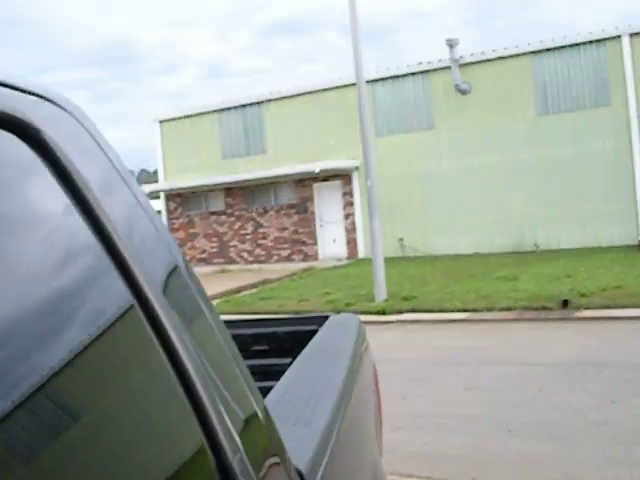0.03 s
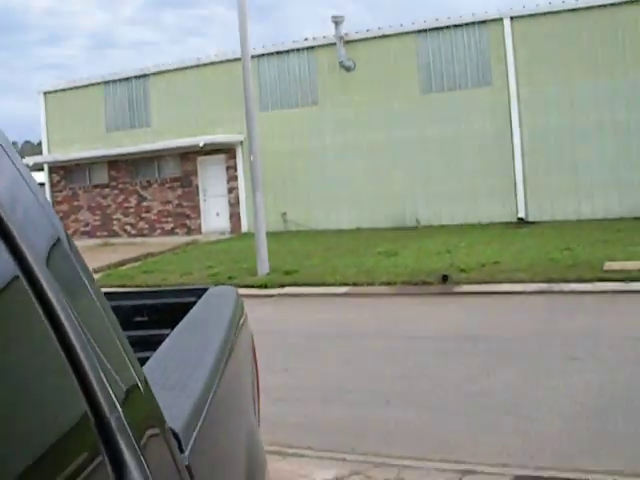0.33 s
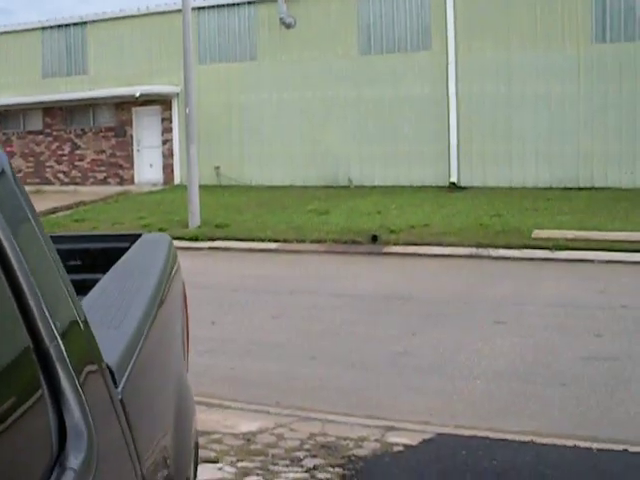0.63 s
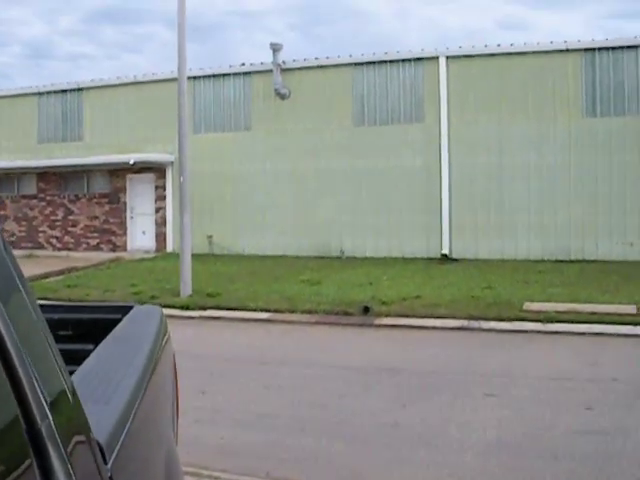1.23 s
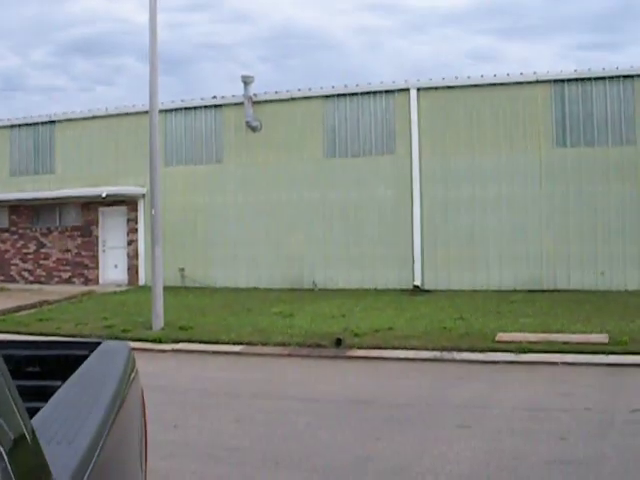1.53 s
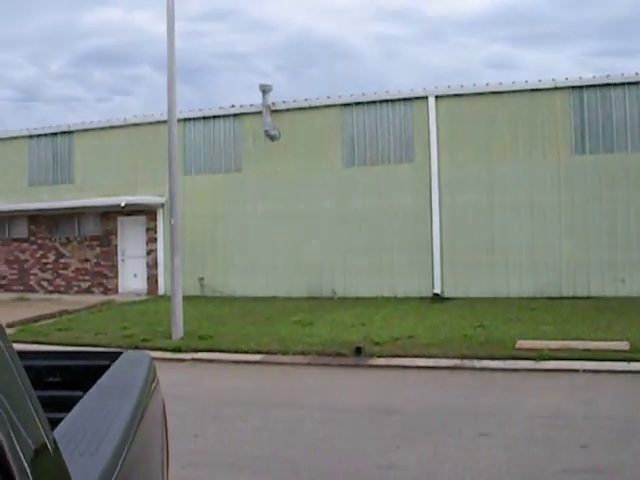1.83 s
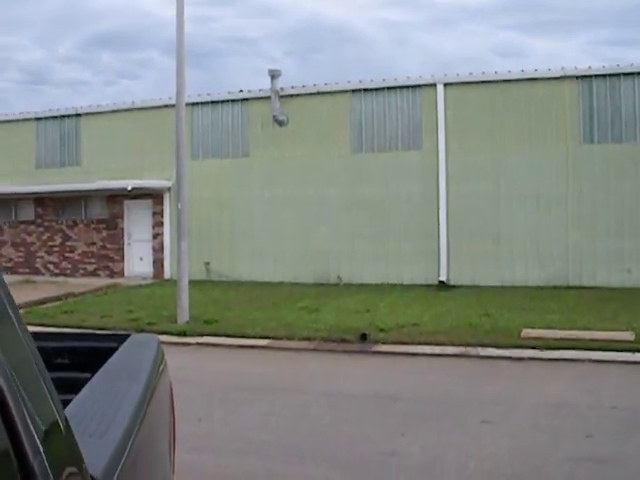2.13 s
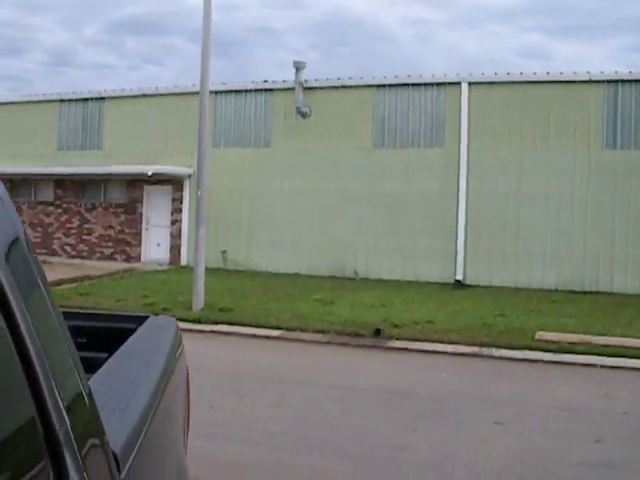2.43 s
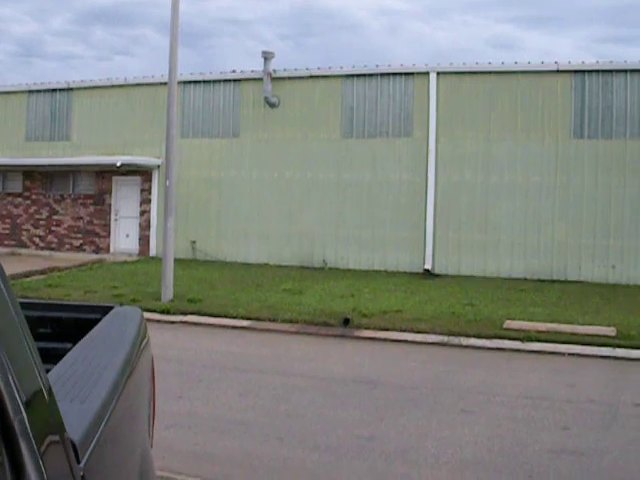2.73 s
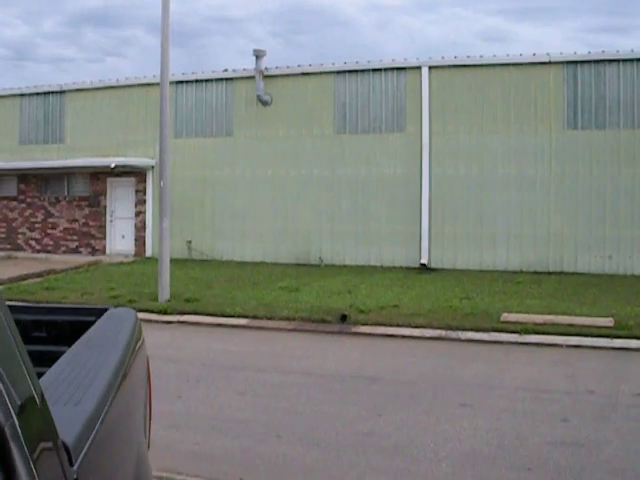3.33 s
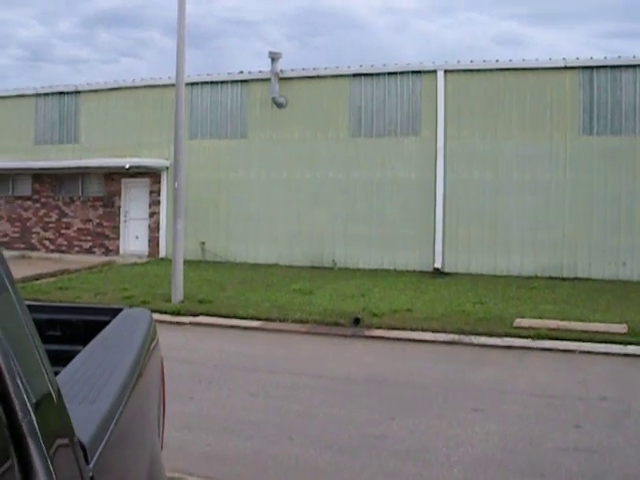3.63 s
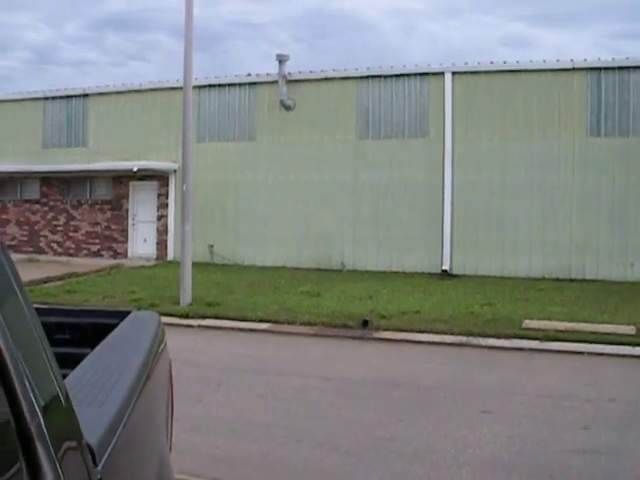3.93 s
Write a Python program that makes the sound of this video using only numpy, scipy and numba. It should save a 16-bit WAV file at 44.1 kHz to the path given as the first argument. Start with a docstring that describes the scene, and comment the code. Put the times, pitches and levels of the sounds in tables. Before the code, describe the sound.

A truck's air horn blasts twice on a quiet street. First come a low rumble and a few faint finger ticks near the microphone. At 1.2 seconds a valve pops, squeaks and hisses, and a very loud, distorted five-note chord swells, holding until 1.7 seconds and echoing off buildings. A longer blast runs from 2.4 to 3.3 seconds, its echo fading until the end at about 3.9 seconds.

```python
"""A five-chime air horn on a parked pickup sounds twice, close to a small camera in a quiet street.
The air valve pops, squeaks and hisses, then the air shakes a thin metal disc in each horn. The highest
horn speaks first, a little sharp; the chord fills in and overloads the microphone. Buildings echo
each blast. The camera's gain control turns the street down, then pulls the fading echo up.
Before the first blast, fingers tick on the camera body."""
import sys
import numpy as np
from scipy import signal
from scipy.fft import rfft, irfft
from scipy.io import wavfile
from scipy.ndimage import map_coordinates
from numba import njit

SR = 44100
rng = np.random.default_rng(int(sys.argv[2]) if len(sys.argv) > 2 else 0)


def transcribe(u):
    """Save the signal u as a 16-bit wav file named by the first command-line argument.

    u: samples, shape (n,) or (channels, n), limited to [-1, 1]; the rate is SR.
    q: integer samples, one column per channel.
    """
    v = np.clip(np.atleast_2d(u).T, -1, 1)
    q = np.round(v * 32767).astype(np.int16)
    wavfile.write(sys.argv[1], SR, q)


N = 176400

# tone colour of the street rumble (frequency [Hz], level [dB])
STREET_COLOUR = [(25, -42), (70, -11.5), (120, -10), (185, 1.5), (280, -2.5), (700, -5.5), (1200, -7),
                 (1900, -14.5), (2600, -11.5), (3700, -21), (4400, -33.5)]
# finger ticks on the camera (time [s], peak level [dB])
FINGER_TICKS = [(.018, -5), (.028, -8), (.0395, -5), (.081, -8.5), (.0995, -12.5), (.2225, -9),
                (.5712, -2.5)]
# tone colour of one tick (frequency [Hz], level [dB])
TICK_COLOUR = [(100, -12), (500, 2), (1000, 2.5), (2000, -7), (3600, -8.5), (4400, -24)]
# the two blasts (valve opens [s], valve closes [s], pop level [dB])
BLAST_TIMES = [(1.192, 1.714, -2.5), (2.395, 3.256, -13)]
# tone colour of the valve's pop (frequency [Hz], level [dB])
POP_COLOUR = [(100, -42), (400, -2), (700, -10), (890, 7.5), (1000, -8.5), (1110, 4), (1550, -32.5),
              (1950, -24), (2150, -18), (2500, -22.5), (4400, -27.5)]
# squeaks of the opening valve (start [s], length [s], pitch [Hz], level [dB])
VALVE_SQUEAKS = [(1.206, 0.026, 3995, -11), (1.207, 0.011, 2102, -1.5), (2.391, 0.017, 1120, -12),
                 (2.393, 0.014, 2082, -11), (2.4, 0.051, 3978, -11.5), (2.418, 0.02, 2040, -11)]
# tone colour of the open valve's hiss (frequency [Hz], level [dB])
HISS_COLOUR = [(100, -39.5), (600, -15.5), (1200, -1.5), (2200, 1.5), (4200, 7)]
# tone colour of the rushing noise at full blast, with a harsh overload band near 3160 Hz
# (frequency [Hz], level [dB])
BLAST_NOISE_COLOUR = [(100, -45), (300, -17.5), (850, 5.5), (1150, 0.5), (1500, -0.5), (2150, 2.5),
                      (2900, -4.5), (3160, 1.5), (3350, -10.5), (3600, -3.5), (4400, -19.5)]
# the note of each horn, low to high (pitch [Hz])
HORN_NOTES = [276.4, 340.2, 407.8, 445.0, 498.9]
# how each horn starts and stops, low to high (delay [s], swell [s], starts sharp by [%], die-away [s])
HORN_MOTION = [(.105, 0.17, 1.5, 0.073), (.09, 0.11, 3.5, 0.064), (.125, 0.24, 2.5, 0.036),
               (.118, .08, 3.5, 0.057), (0.00608, 0.28, 10, 0.022)]
# one row per horn, one column per harmonic from the base note up (relative level [dB])
HORN_HARMONICS = [
    [-30, -28.5, -20, -39.5, -29.5, -32, -43, -37.5, -31, -42.5, -43, -46.5, -45.5, -50, -58.5],
    [-32, -18, -27, -40.5, -46.5, -29, -32, -44, -45.5, -50.5, -48.5, -55.5],
    [-28.5, -23, -30, -27.5, -28, -36, -40, -49.5, -47, -54],
    [-34, -14.5, -26, -30, -37, -43, -35.5, -41, -48.5],
    [-22.5, -22.5, -32, -26.5, -26.5, -41.5, -33.5, -46],
]
# narrow bands that the horns' flared bells make louder (centre [Hz], width [Hz], boost [dB])
BELL_PEAKS = [(1542, 28, 14), (1040, 27, 0.5)]
# echoes from single buildings (delay [s], level [dB])
WALL_ECHOES = [(.23, -25), (.41, -43.5)]
# tone colour of all the echoes (frequency [Hz], level [dB])
ECHO_COLOUR = [(150, -14.5), (275, -3), (345, 4), (440, 0.5), (510, 0), (560, -8), (680, -7.5), (900, -12),
               (1350, -1.5), (1750, -5), (2400, -13), (3600, -9), (4200, -18)]


def undb(db):
    """Turn decibels into a number to multiply by."""
    return 10 ** (np.asarray(db) / 20)


def unit(x):
    """Scale a signal to an average (rms) size of 1."""
    return x / np.sqrt(np.mean(x ** 2))


def response(colour):
    """Join the points of a tone colour table into a gain for every frequency."""
    hz, db = np.array(colour).T
    frequencies = np.arange(N // 2 + 1) * SR / N
    return undb(np.interp(np.log(frequencies + 1), np.log(hz), db))


def noise(colour):
    """Noise of average size 1 with the given tone colour."""
    return unit(irfft(rfft(rng.standard_normal(N)) * response(colour), N))


def wander(rate):
    """A smooth random wobble of average size 1, through `rate` new values a second."""
    times = np.linspace(0, N / SR, 8000)
    motion = map_coordinates(rng.standard_normal(4096), [times * rate], order=3, mode="wrap")
    return np.interp(np.arange(N) / SR, times, unit(motion))


def ramp(u):
    """A smooth step from 0 to 1."""
    return np.sin(np.pi / 2 * np.clip(u, 0, 1)) ** 2


def blast_clocks(t):
    """Seconds since the current blast's valve opened, and since it closed (0 until then)."""
    (open1, close1, _), (open2, close2, _) = BLAST_TIMES
    second = t > open2
    return t - np.where(second, open2, open1), np.maximum(t - np.where(second, close2, close1), 0)


@njit
def follow(x, attack, release):
    """Track a level, rising fast and falling slowly."""
    out, level = np.empty(len(x)), 0.
    for i in range(len(x)):
        level += (x[i] - level) * (attack if x[i] > level else release)
        out[i] = level
    return out


def street_rumble(level_db=-28, drift_db=.5):
    """The street gives a low, even rumble whose level drifts a little."""
    return undb(level_db + drift_db * wander(3.4)) * noise(STREET_COLOUR)


def finger_ticks():
    """Fingers knock on the camera body, making small dry ticks."""
    taps = np.zeros(N)
    for when, db in FINGER_TICKS:
        taps[int(when * SR)] += undb(db)
    # build a click of this colour with its energy packed at the start (minimum phase)
    cepstrum = irfft(np.log(response(TICK_COLOUR)), N)
    cepstrum[N // 2:] = 0
    tick = irfft(np.exp(2 * rfft(cepstrum)), N)[:256]
    tick = signal.sosfilt(signal.butter(4, 4200, fs=SR, output="sos"), tick)
    return -np.convolve(taps, tick / np.max(np.abs(tick)))[:N]


def valve(t, pop_decay_s=.032, wobble=.003, rough_db=4):
    """Air pops out as the valve opens and squeaks roughly through the narrow gap."""
    out = np.zeros(N)
    for opens, _, pop_db in BLAST_TIMES:
        age = np.maximum(t - opens, 0)
        out += undb(pop_db) * ramp(age / .0013) * np.exp(-age / pop_decay_s) * noise(POP_COLOUR)
    for start, length, hz, db in VALVE_SQUEAKS:
        gate = ramp((t - start) / .002) * ramp((start + length - t) / .006)
        phase = 2 * np.pi * np.cumsum(hz * (1 + wobble * wander(400))) / SR
        out += gate * undb(db + rough_db * wander(200)) * np.sin(phase)
    return out


def hiss_and_blast_noise(t, hiss_db=-13, blast_db=9.5, fade_s=.07):
    """The open valve hisses, a harsh rushing noise joins at full blast, and both fade once it shuts."""
    age, since_closed = blast_clocks(t)
    hiss = undb(hiss_db) * ramp(age / .0056) * noise(HISS_COLOUR)
    blast_noise = undb(blast_db) * ramp((age - .1) / .14) * noise(BLAST_NOISE_COLOUR)
    return (hiss + blast_noise) * np.exp(-since_closed / fade_s)


def bell_boost_db(hz):
    """The flared bells boost a harmonic as it glides through one of their peaks."""
    return sum(db * np.exp(-np.minimum(((hz - centre) / width) ** 2, 20))
               for centre, width, db in BELL_PEAKS)


def horns(t, gain_db=32.5, settle_s=.05, jitter=.001435, waver_db=.7):
    """Each horn's disc starts sharp, settles and brightens with pressure, and fades as the air drains."""
    out = np.zeros(N)
    age, since_closed = blast_clocks(t)
    pressure_surge = (np.maximum(age - .14, 0) / .14) ** 2  # the air line comes up to full pressure
    end_lift = .014 * ramp(since_closed / .2)  # pitch rises as the air drains
    tuning = np.where(t > BLAST_TIMES[1][0], -.0003, .0003)  # the second blast is a touch lower
    for hz, motion, harmonics in zip(HORN_NOTES, HORN_MOTION, HORN_HARMONICS):
        delay, swell, sharp_percent, die_away = motion
        sounding = np.maximum(age - delay, 0)
        rise = 1 - np.exp(-(sounding / swell) ** .73 - pressure_surge)
        drive = rise * np.exp(1 - np.hypot(since_closed / die_away, 1))
        overtone_drive = drive ** 2.11  # overtones come later and leave sooner than the base note
        start_bend = sharp_percent / 100 * np.exp(-sounding / settle_s)
        pitch = hz * (1 + start_bend + end_lift + jitter * wander(80) + tuning)
        phase = 2 * np.pi * np.cumsum(pitch) / SR
        for k, db in enumerate(harmonics, 1):
            size = undb(db + bell_boost_db(k * pitch) + waver_db * wander(4.855))
            size *= drive if k == 1 else overtone_drive
            out += np.sqrt(2) * size * np.sin(k * phase + rng.uniform(0, 2 * np.pi))
    return undb(gain_db) * out


def building_echoes(sound, t, paths=4, tail_db=-17.5, build_s=.18, fade_60db_s=2.6, flutter_rad=.67):
    """Buildings send back two clear echoes and a long tail whose paths waver in the moving air."""
    coloured = irfft(rfft(sound) * response(ECHO_COLOUR), N)
    out = sum(undb(db) * np.interp(t - delay, t, coloured) for delay, db in WALL_ECHOES)
    fade = ramp(t / build_s) * np.exp(-np.log(1000) * t / fade_60db_s)
    for _ in range(paths):
        tail = rng.standard_normal(N) * fade
        tail *= undb(tail_db) / np.sqrt(paths * np.sum(tail ** 2))
        # the complex (Hilbert) form lets us nudge the phase of this path
        path = signal.hilbert(signal.fftconvolve(coloured, tail), 2 * N)[:N]
        out += np.real(path * np.exp(1j * flutter_rad * wander(22)))
    return out


def scene():
    """The truck's horn and its echoes, over the street rumble and finger ticks."""
    t = np.arange(N) / SR
    truck = horns(t) + hiss_and_blast_noise(t) + valve(t)
    return (street_rumble() + finger_ticks() + truck + building_echoes(truck, t))[None]


def record(dry, overload_db=33, threshold_db=-12.5, ratio=5.524, attack_s=.0016, release_s=.067):
    """The microphone overloads, gain control turns loud parts down, peaks clip, and the camera stops."""
    t = np.arange(N) / SR
    limit, bias = undb(overload_db), .0064  # the bias squashes one side of the wave a little more
    x = limit * (np.tanh(dry[0] / limit + bias) - np.tanh(bias))
    level = follow(np.abs(x), 1 / (1 + attack_s * SR), 1 / (1 + release_s * SR))
    x *= np.maximum(level / undb(threshold_db), 1) ** (1 / ratio - 1)
    x = signal.sosfilt(signal.cheby1(12, .3, 4200, fs=SR, output="sos"), x)  # cut the treble
    x = np.clip(x, -.72, .72)  # flattening the peaks adds some treble back
    x *= ramp((3.942 - t) / .0019)  # the camera stops at 3.942 s
    return signal.sosfilt(signal.ellip(8, .2, 70, 15800, fs=SR, output="sos"), x)[None]


dry = scene()
out = record(dry)
transcribe(out)
```